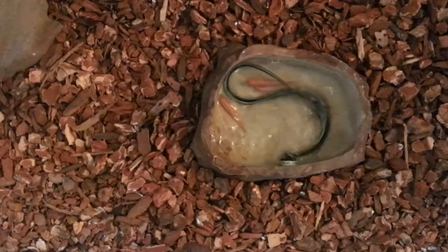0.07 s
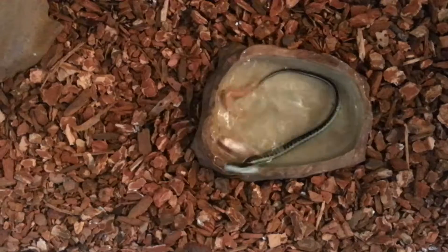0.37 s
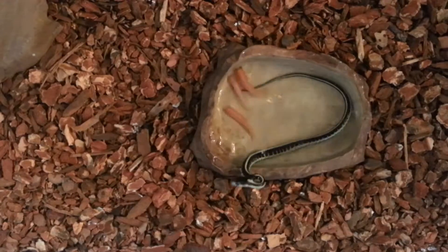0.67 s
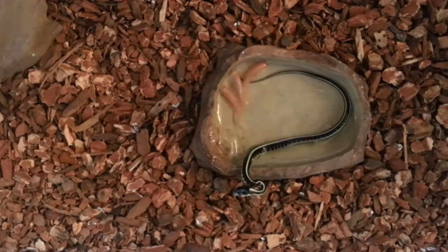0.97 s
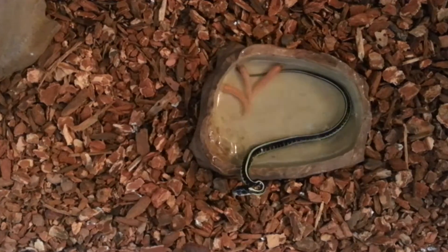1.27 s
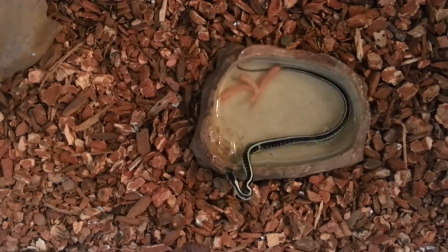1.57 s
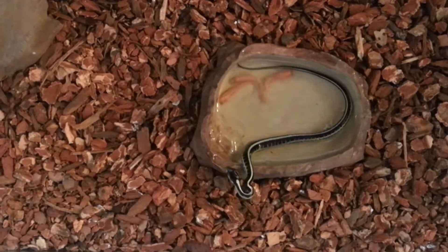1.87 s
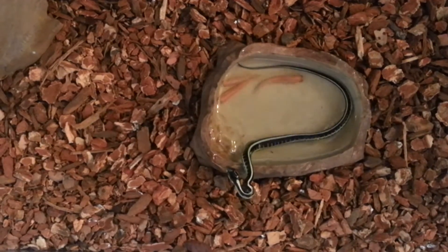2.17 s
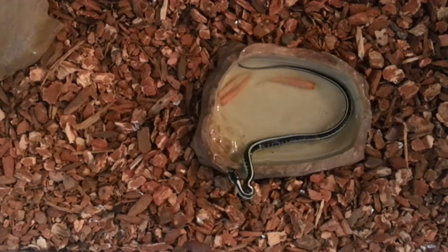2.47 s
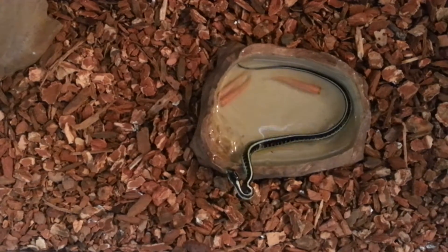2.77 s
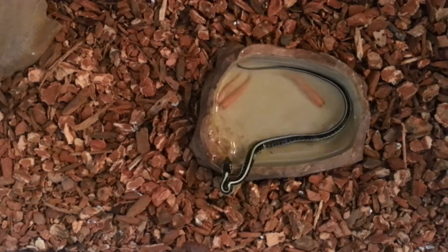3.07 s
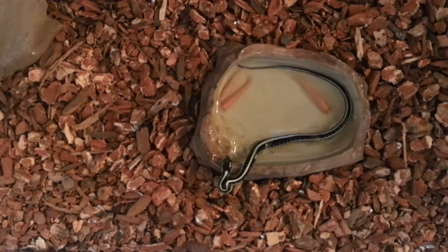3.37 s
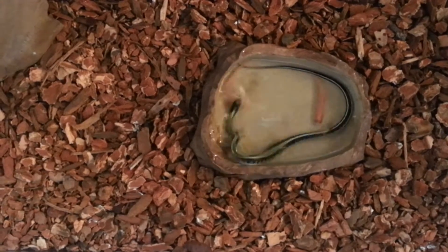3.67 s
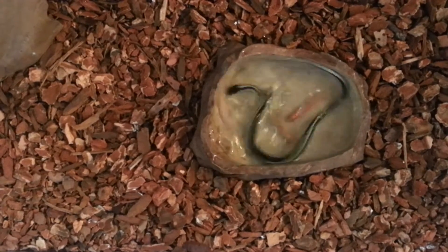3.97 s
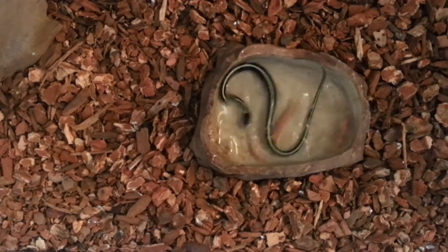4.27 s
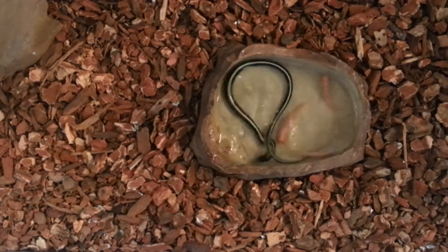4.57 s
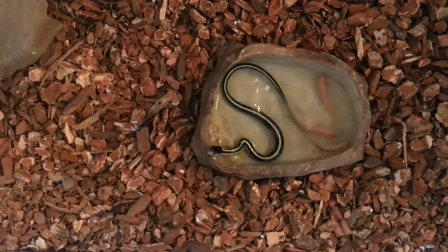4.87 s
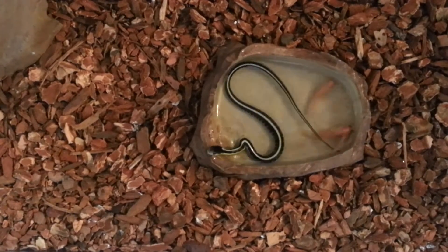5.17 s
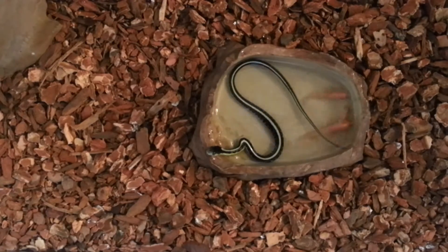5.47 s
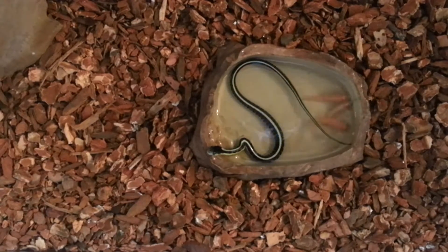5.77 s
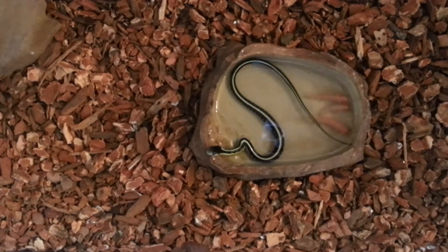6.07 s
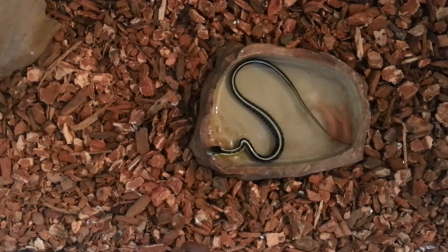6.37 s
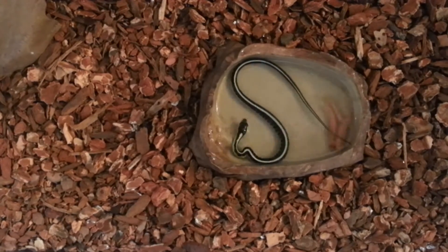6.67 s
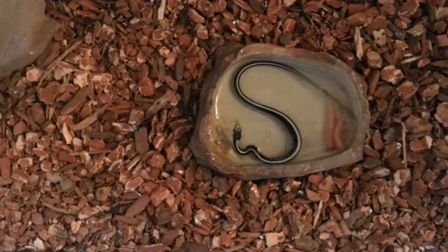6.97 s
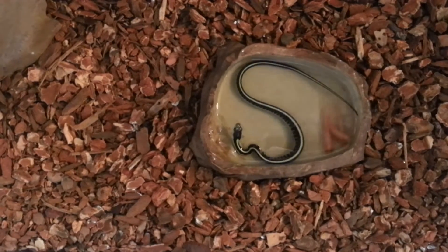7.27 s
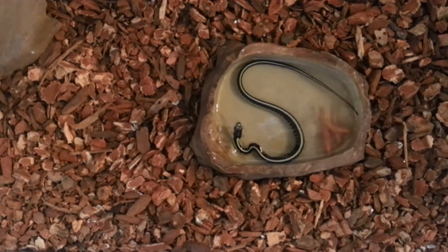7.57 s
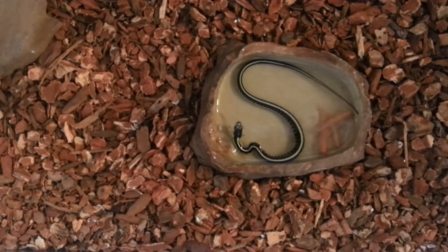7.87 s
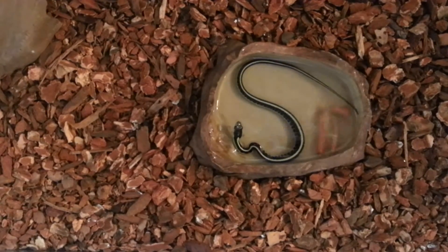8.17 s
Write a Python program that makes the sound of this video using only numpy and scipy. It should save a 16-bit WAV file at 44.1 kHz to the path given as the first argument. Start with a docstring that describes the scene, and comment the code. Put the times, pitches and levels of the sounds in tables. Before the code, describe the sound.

A steady fan hum in a room, with one brief, sharp splash and a few droplets as a small snake lunges in water.

```python
"""A ventilated room, a small snake in a water dish. After 0.8 s of silence a steady hum cuts in:
fan noise ringing the room's modes, with a few throbbing fan and motor tones. The camera adds a
faint whine and tiny ticks at its left microphone. At 3.7 s the snake lunges once: a plip, a sharp
splash, a few droplets (surface slaps and ringing bubbles), echoed by tank and room."""
import sys
import numpy as np
from scipy import signal
from scipy.fft import rfft, irfft
from scipy.io import wavfile

SR = 44100
rng = np.random.default_rng(int(sys.argv[2]) if len(sys.argv) > 2 else 0)


def to_wav(sig):
    """Store sig (one row per channel, or 1-D mono) as 16-bit WAV at the path in sys.argv[1].

    Samples outside -1..1 are clipped; the rate is SR.
    """
    pcm = np.clip(np.atleast_2d(sig), -1, 1) * 32767
    pcm = np.round(pcm).astype(np.int16)
    wavfile.write(sys.argv[1], SR, pcm.T)  # frames by channels


N = 367353

# diffuse air rush, ending in microphone hiss: (frequency [Hz], density [dB/Hz])
AIR_SPECTRUM = [(25, -105.1), (60, -101.5), (85, -85.5), (110, -79), (220, -77.5), (450, -72), (650, -78.5),
                (950, -70), (1600, -76.5), (2800, -82), (4500, -88.5), (6300, -100.6), (9000, -102.2),
                (14400, -101.0)]
# lean of the rush: (frequency [Hz], boost left and cut right [dB])
AIR_BALANCE = [(100, 1), (280, 4), (600, 1.5), (1500, 0.1), (3500, 2.5), (4500, 3), (6300, -2),
               (9000, -0.3), (12000, 0.7)]
# likeness of the rush on both sides: (frequency [Hz], correlation before clipping [-])
AIR_CORRELATION = [(30, .2), (80, 0.85), (180, 0.93), (260, -1.2), (450, 0.55), (700, 0.46), (1100, -0.29),
                   (3000, 0.011)]
# room modes: (centre [Hz], width [Hz], relative density [dB], left-right [dB], left phase lead [rad])
ROOM_RESONANCES = [(109, 9, -68.5, 1, -0.1), (117, 4, -66, 0, -0.1), (144, 13, -64.8, 0, -0.1),
                   (157, 7, -66, -1, -0.1), (168, 6, -67, -5, -0.2), (189, 11, -67.6, -1, 0.0),
                   (226, 17, -68.8, 9, 1.3), (251, 7, -72, 0, 0.0), (270, 12, -68.3, 8, 0.5),
                   (297, 11, -60.3, 1, 0.0), (328, 10, -59.2, 7, 0.1), (344, 12, -62, 8, 0.1),
                   (367, 13, -64.5, 1, 0.1), (389, 7, -60, 1, -0.1), (403, 6, -67.5, 0, 0.0),
                   (424, 11, -65.5, -2, -0.1), (438, 6, -63.8, -1, -0.1), (462, 9, -62, 4, 0.6),
                   (488, 20, -57.7, 1, -0.0), (509, 5, -61.5, 0, 0.0), (532, 34, -65.2, -7, 1.3),
                   (555, 9, -63.5, 9, -0.6), (588, 9, -69, -6, 0.0), (624, 27, -74.2, 12, 0.8),
                   (682, 38, -72.6, -5, 0.0), (758, 24, -66.7, -2, 0.1), (791, 13, -66.9, -4, 0.3),
                   (836, 24, -67.4, 4, -1.0), (873, 44, -70.4, 3, 2.6), (950, 26, -67.6, 2, 0.1),
                   (1008, 9, -65.6, 0, 2.4), (1078, 14, -72, -3, 1.5), (1115, 11, -69.9, -8, -1.2),
                   (1139, 14, -71.5, 9, -1.5), (1223, 13, -70.3, 9, -1.9), (1380, 7, -72.2, 7, 2.8),
                   (1468, 31, -68.6, 1, 2.3), (1744, 16, -76.2, -3, -1.6), (1825, 6, -75.0, 4, -0.2),
                   (2241, 28, -80.9, -5, -1.3)]
# fan shaft tones: (multiple of shaft rate [-], rms level [dB], left-right [dB])
SHAFT_HARMONICS = [(3, -57, 0), (4, -57.5, -6), (5, -62.5, -6), (7, -58, -1), (8, -60.5, 13)]
# motor hum: (multiple of mains frequency [-], rms level [dB], left-right [dB])
MAINS_HARMONICS = [(2, -54, 0.5), (6, -58.5, 1)]
# camera electronics: (frequency [Hz], left rms [dB], right rms [dB])
WHINE_TONES = [(11310, -81, -100), (13534, -92, -90)]
# ticks in the camera body, mostly 1.28 s apart: (time [s])
TICK_TIMES_S = [1.5834, 2.8634, 4.1433, 6.6743, 7.9603]
# bubbles and droplets: (time [s], peak level [dB], pitch [Hz])
BUBBLES = [(3.7172, -41, 10200), (3.7618, -26.5, 2270), (3.7632, -27.5, 2480), (3.806, -38, 5360),
           (3.8410, -31.5, 3080)]
# water surface slaps: (time [s], peak rms [dB], left-right [dB], spectrum frequency scale [-])
SURFACE_SLAPS = [(3.7480, -46, -2, 1.27), (3.7618, -49, 0, 0.8), (3.773, -38, -7, 0.55),
                 (3.773, -26.5, -3, 1.01), (3.7740, -24, -4, 0.995), (3.777, -31.5, -5, 0.908),
                 (3.778, -42, -2, 0.55), (4.0142, -49, 0, 0.62), (4.0146, -38.5, 0, 0.85),
                 (4.0540, -48, 0, 1.26)]
# spectrum of a slap: (frequency [Hz], relative level [dB])
SLAP_SPECTRUM = [(1000, -45), (3500, -16), (5000, -10), (6500, -13), (8100, -11), (8500, 4), (10700, -1),
                 (11500, -7), (13600, -9), (15000, -28)]


def amp(db):
    """Decibels to gain."""
    return 10 ** (np.asarray(db) / 20)


def curve_at(points, hz):
    """Interpolate (frequency [Hz], value) on a log axis."""
    points_hz, values = np.transpose(points)
    return np.interp(np.log(hz + 1), np.log(points_hz + 1), values)


def pan(balance_db):
    """Left and right gains as a column."""
    return amp([[balance_db / 2], [-balance_db / 2]])


def add(mix, time_s, sound):
    """Mix a sound in at time_s."""
    part = mix[:, round(time_s * SR):][:, :sound.shape[1]]
    part += sound[:, :part.shape[1]]


def noise_bins(size):
    """Noise spectrum, unit power per Hz."""
    return (rng.standard_normal(size) + 1j * rng.standard_normal(size)) * np.sqrt(N * SR) / 2


def envelope(t, rise_s, t60_s):
    """Soft rise, exponential decay, peak 1."""
    shape = (1 - np.exp(-t / rise_s)) * amp(-60 * t / t60_s)
    return shape / shape.max()


def ring(hz, t60_s, rise_s, glide=0):
    """Decaying sine; pitch climbs by the fraction glide over t60_s, then holds."""
    t = np.arange(SR // 20) / SR
    pitch_hz = hz * (1 + glide * np.minimum(t / t60_s, 1))
    return envelope(t, rise_s, t60_s) * np.sin(2 * np.pi * np.cumsum(pitch_hz) / SR)


def harmonics(base_hz, table, waver):
    """Sines on multiples of a rate that drifts slowly by the fraction waver."""
    t = np.arange(N) / SR
    drift = np.interp(t, np.arange(10), rng.standard_normal(10))
    turns = np.cumsum(base_hz * (1 + waver * drift)) / SR
    return sum(np.sqrt(2) * amp(db) * pan(balance_db) * np.sin(2 * np.pi * (order * turns + rng.random()))
               for order, db, balance_db in table)


def air_rush(ripple_db=2.5, ripple_step_hz=22):
    """Diffuse fan noise: alike on both sides in the bass, unrelated in the treble."""
    hz = np.fft.rfftfreq(N, 1 / SR)
    correlation = np.clip(curve_at(AIR_CORRELATION, hz), -1, 1)
    lean = amp(curve_at(AIR_BALANCE, hz))
    left = noise_bins(len(hz))
    right = correlation * left + np.sqrt(1 - correlation ** 2) * noise_bins(len(hz))
    # overlapping high modes ripple each side's spectrum
    knots = rng.standard_normal((2, SR // 10))
    ripple = np.array([np.interp(hz / ripple_step_hz, np.arange(len(row)), row) for row in knots])
    ripple *= curve_at([(600, 0), (1200, 1), (4000, 1), (6500, 0)], hz)
    gain = amp(curve_at(AIR_SPECTRUM, hz) + ripple_db * ripple)
    return irfft(np.array([left * lean, right / lean]) * gain, N)


def room_hum(gain_db=-0.37):
    """Noise-driven standing waves, each with its own level and phase at each microphone."""
    hz = np.fft.rfftfreq(N, 1 / SR)[:N // 12]
    bins = np.zeros((2, len(hz)), complex)
    for centre_hz, width_hz, db, balance_db, lead_rad in ROOM_RESONANCES:
        detuning = 2 * (hz - centre_hz) / width_hz
        resonance = amp(db + gain_db) / (1 + (np.sqrt(2) - 1) * detuning ** 2)
        sides = pan(balance_db) * np.array([[np.exp(1j * lead_rad)], [1]])
        bins += sides * resonance * noise_bins(len(hz))
    return irfft(bins, N)


def fan_tones(shaft_hz=41.82, mains_hz=60):
    """The third shaft harmonic beats against the motor hum at twice mains frequency."""
    shaft = harmonics(shaft_hz, SHAFT_HARMONICS, waver=0.0015)
    motor = harmonics(mains_hz, MAINS_HARMONICS, waver=0)
    return shaft + motor


def camera_whine():
    """Thin steady tones from the electronics."""
    t = np.arange(N) / SR
    return sum(np.sqrt(2) * amp([[left_db], [right_db]]) * np.sin(2 * np.pi * hz * t)
               for hz, left_db, right_db in WHINE_TONES)


def camera_ticks(left_db=-33, right_db=-55):
    """Each tick briefly rings the case beside the left microphone."""
    out = np.zeros((2, N))
    tick = amp([[left_db], [right_db]]) * ring(hz=12000, t60_s=0.0007, rise_s=0.0001)
    for time_s in TICK_TIMES_S:
        add(out, time_s, tick)
    return out


def bubbles(t60_at_1khz_s=0.017, damping_exponent=0.74):
    """Trapped bubbles ring with rising pitch; smaller, higher ones die sooner."""
    out = np.zeros((2, N))
    for time_s, db, pitch_hz in BUBBLES:
        t60_s = t60_at_1khz_s * (1000 / pitch_hz) ** damping_exponent
        add(out, time_s, amp(db) * ring(pitch_hz, t60_s, rise_s=0.00015, glide=0.06)[None])
    return out


def splash():
    """The lunge slaps the surface: short, bright noise bursts."""
    out = np.zeros((2, N))
    t = np.arange(2048) / SR
    hz = np.fft.rfftfreq(len(t), 1 / SR)
    burst = envelope(t, rise_s=0.00038, t60_s=0.009)
    for time_s, db, balance_db, brightness in SURFACE_SLAPS:
        shared, *per_side = rng.standard_normal((3, len(t)))
        noise = shared + 2 * np.array(per_side)
        spray = irfft(rfft(noise) * amp(curve_at(SLAP_SPECTRUM, hz / brightness)))
        add(out, time_s, amp(db) * pan(balance_db) * burst * spray / spray.std())
    return out


def echoes(sound, t60_s, level_db, delay_s):
    """Dense random reflections, different on each side."""
    t = np.arange(SR // 2) / SR
    taps = rng.standard_normal((2, len(t))) * (t > delay_s) * amp(-60 * t / t60_s)
    taps /= np.linalg.norm(taps, axis=1, keepdims=True)
    return amp(level_db) * signal.fftconvolve(sound, taps, axes=1)[:, :N]


def scene():
    """Ventilation and camera, plus water with quick tank echoes and a faint room tail."""
    water = bubbles() + splash()
    tank = echoes(water, t60_s=0.078, level_db=-6.5, delay_s=0.003)
    room = echoes(water, t60_s=0.45, level_db=-19, delay_s=0.0098)
    ventilation = air_rush() + room_hum() + fan_tones()
    return ventilation + camera_whine() + camera_ticks() + water + tank + room


def record(dry, start_s=0.8148, cutoff_hz=14650):
    """Abrupt switch-on, then low-pass."""
    gated = dry * (np.arange(N) >= start_s * SR)
    lowpass = signal.firwin(511, cutoff_hz, window=("kaiser", 9), fs=SR)
    return signal.oaconvolve(gated, lowpass[None], "same")


dry = scene()
out = record(dry)
to_wav(out)
```